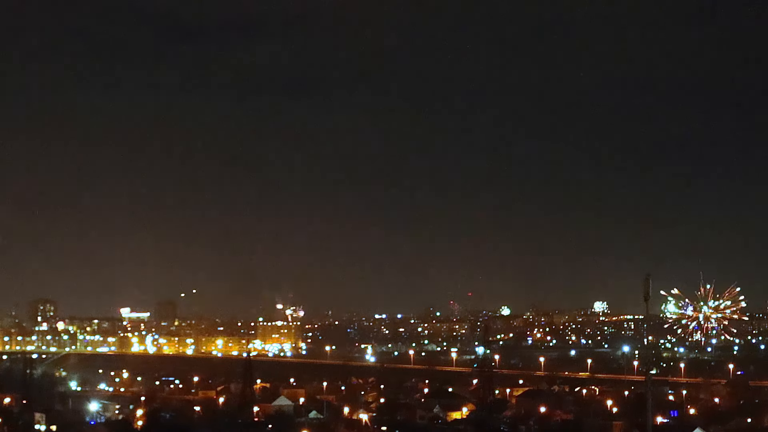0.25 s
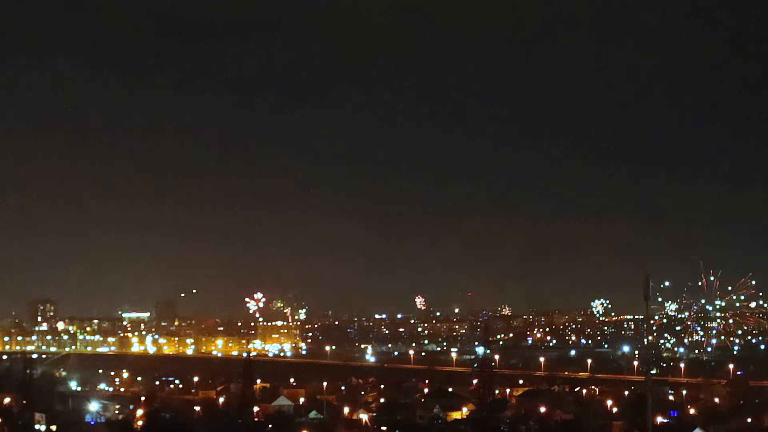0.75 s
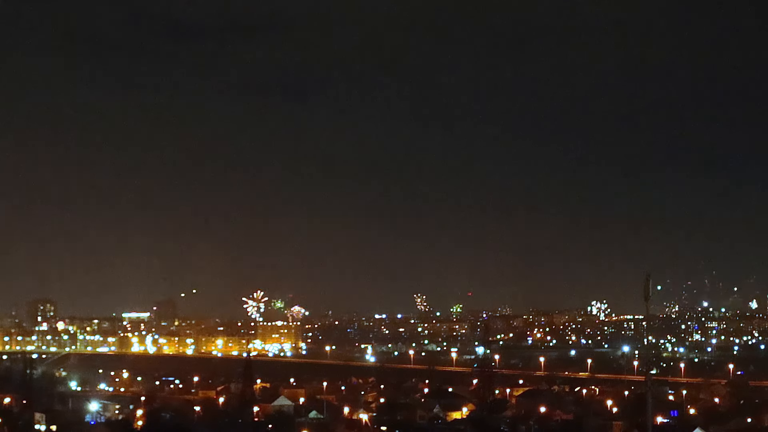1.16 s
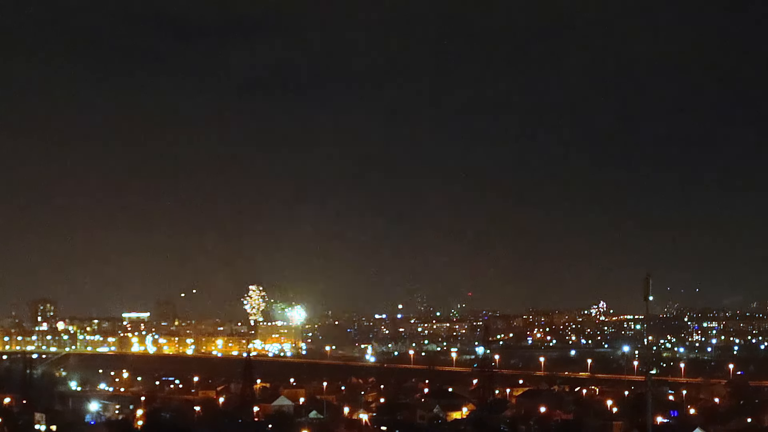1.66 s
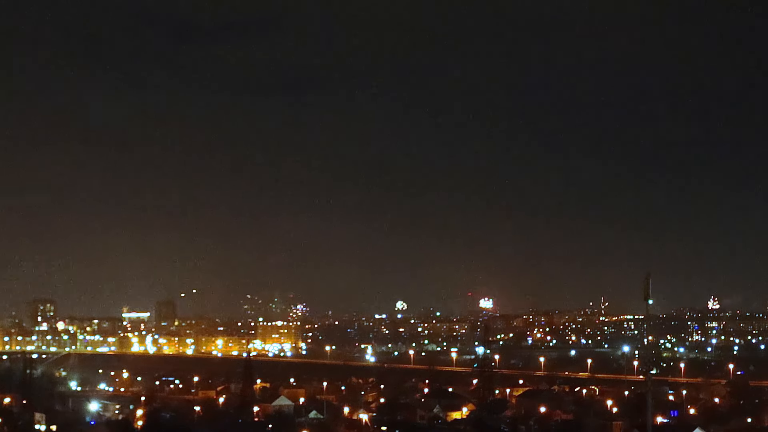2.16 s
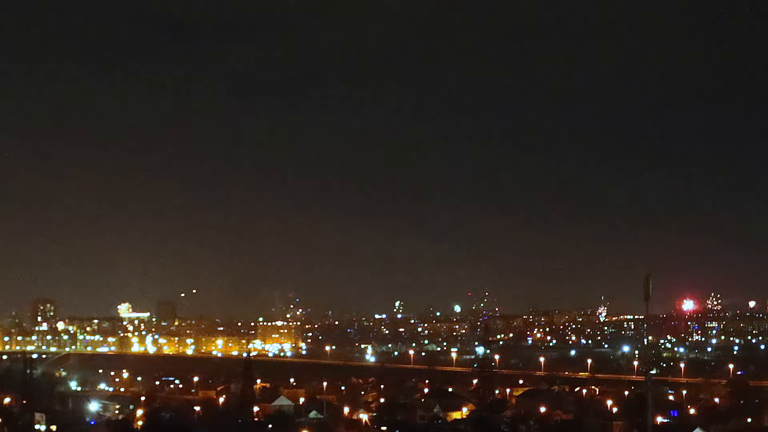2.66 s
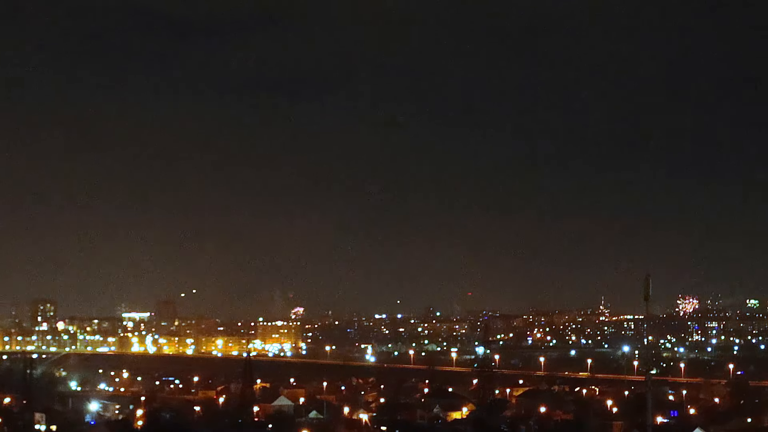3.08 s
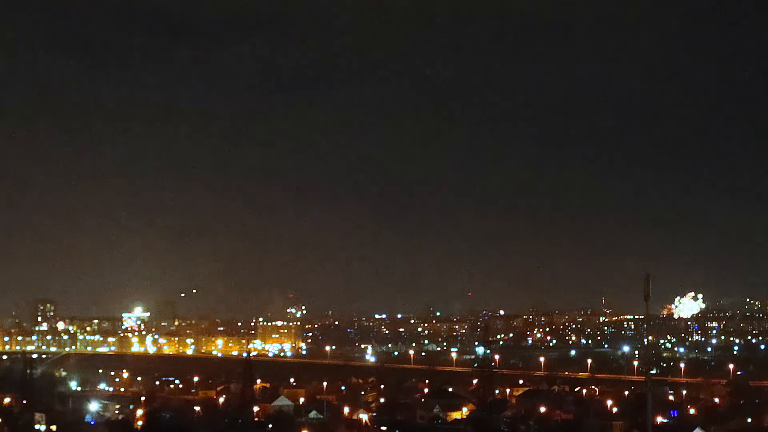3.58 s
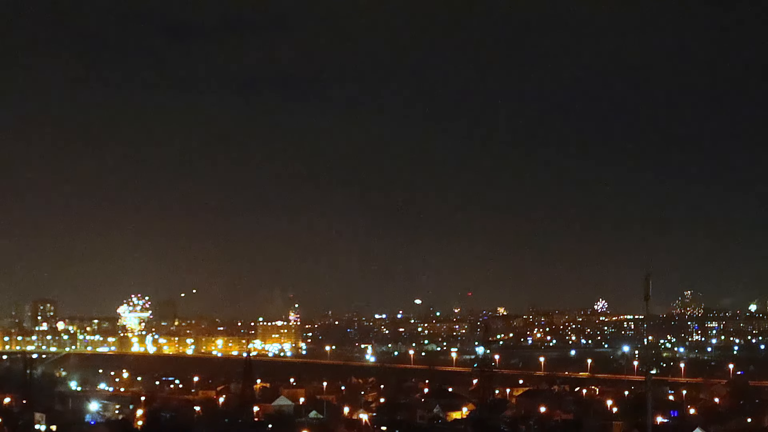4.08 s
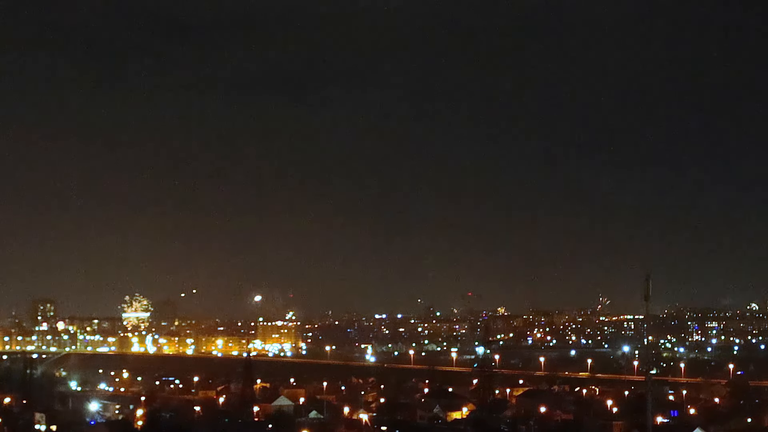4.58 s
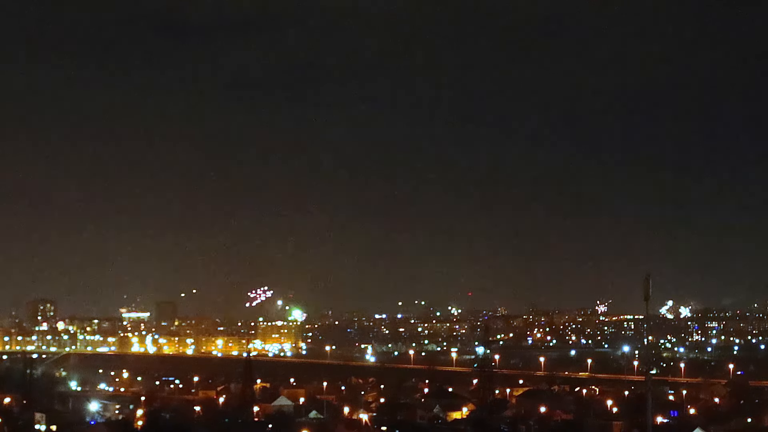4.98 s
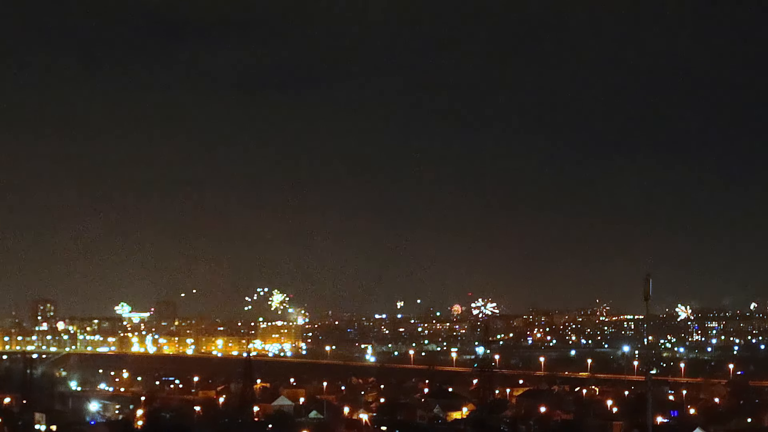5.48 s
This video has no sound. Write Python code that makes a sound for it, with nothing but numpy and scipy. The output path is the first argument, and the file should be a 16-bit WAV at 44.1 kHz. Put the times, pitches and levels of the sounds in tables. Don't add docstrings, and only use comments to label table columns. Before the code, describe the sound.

Distant fireworks over a city at night: dull overlapping thumps, short echoes and small crackles above a far rumble, with brief wind flutter at the start.

```python
import sys
import numpy as np
from scipy import signal
from scipy.fft import rfft, irfft, next_fast_len
from scipy.io import wavfile
from scipy.ndimage import uniform_filter1d

SR = 44100
rng = np.random.default_rng(int(sys.argv[2]) if len(sys.argv) > 2 else 0)


def dump(signal):
    limited = np.clip(np.atleast_2d(signal).T, -1, 1)
    pcm = np.round(limited * 32767).astype(np.int16)
    wavfile.write(sys.argv[1], SR, pcm)


def attenuation_scalar(level_db):
    decades = np.asarray(level_db, float) / 20
    return 10 ** decades


N = 252693
TIME = np.arange(N) / SR

# start in seconds, thump peak in dB, thump pitch in Hz,
# echo level in dB under the peak.
NEAR_SHELLS = [(.492, -22, 392, -10.5), (.5435, -12.5, 473, -12), (.661, -28, 271, 5.5),
               (1.568, -12.5, 343, -13), (1.628, -16, 327, -10.5), (3.094, -17.5, 526, -26),
               (3.148, -10, 254, -13), (3.547, -16.5, 240, -11), (3.837, -17.5, 241, -11),
               (4.036, -23, 254, 1), (4.7905, -11, 324, -11.5), (5.184, -13.5, 315, -11.5),
               (5.529, -14.5, 310, -11)]
# the same four columns, in seconds, dB, Hz and dB.
MIDTOWN_SHELLS = [(.25, -20.5, 533, -19), (.387, -14.5, 360, -16.5), (1.07, -20.5, 286, -6.5),
                  (1.24, -15.5, 304, -8.5), (1.327, -16, 382, -14.5), (1.492, -8, 335, -14.5),
                  (1.532, -17, 516, -8.5), (2.013, -15, 355, -11.5), (2.061, -26.5, 244, -2.5),
                  (2.201, -16, 276, -13.5), (2.779, -14, 460, -9.5), (3.284, -16, 255, -8.5),
                  (3.361, -21, 242, -3), (3.924, -14, 388, -7), (4.823, -30.5, 260, 4),
                  (4.891, -9, 322, -24), (5.098, -12, 438, -20), (5.22, -13.5, 537, -13),
                  (5.318, -20.5, 222, -6), (5.559, -15.5, 234, -13.5)]
# the same four columns, in seconds, dB, Hz and dB.
OUTSKIRTS_SHELLS = [(.701, -20, 288, -13), (.79, -24.5, 350, -4), (1.811, -28, 392, -5),
                    (2.252, -16.5, 296, -4.5), (2.515, -13.5, 310, -16.5), (2.954, -12.5, 337, -10.5),
                    (3.407, -13, 229, -15.5), (3.67, -22.5, 294, -6.5), (3.862, -15, 362, -8.5),
                    (3.977, -13.5, 387, -23.5), (4.091, -12.5, 394, -10), (4.168, -14, 416, -29),
                    (4.399, -17.5, 517, -5), (4.688, -30, 408, -5), (5.132, -12.5, 550, -15),
                    (5.721, -6.5, 530, -5)]
# shells, middle band in dB over the thump,
# echo fade by 60 dB in seconds.
DISTRICTS = [(NEAR_SHELLS, -10.5, 0.49), (MIDTOWN_SHELLS, -14.5, 0.36), (OUTSKIRTS_SHELLS, -17.5, 0.3)]
# start in seconds, thump peak in dB, pitch in Hz, number of swings,
# echo level in dB under the peak.
SALUTES = [
    (2.4858, 2, 330, 0.62, -22),
    (4.8763, -18.5, 347, 1, -9),
    (5.045, -12.5, 516, 0.59, -9.5),
]
# start in seconds, peak in dB, pitch in Hz, swings to fade, swings to rise.
STEEP_SALUTE = (4.8650, 0.1, 352, 1.7, 0.055)
# start in seconds, high band peak in dB,
# top band in dB over it, echo fade by 60 dB in seconds.
CRACKERS = [(0.115, -34, -29, 0.12), (0.218, -44.5, -32, 0.32), (0.369, -41, -24, 0.2),
            (0.544, -30, -32, 0.15), (.6629, -38.5, -29, 0.87), (0.85, -50.5, 10, 0.41),
            (1.497, -45, -10, 0.14), (1.629, -45, -16, 0.4), (1.696, -49.5, 3, 0.8),
            (1.8806, -46, -2, 0.32), (1.974, -51.5, 11, 0.42), (2.0055, -53, 6, 0.32),
            (2.061, -46.5, 8, 0.31), (2.239, -19, 2, 0.22), (2.252, -24.5, -28, 0.23), (2.27, -33, -8, 2.4),
            (2.4823, -31, -11, 0.18), (2.788, -38, -17, 0.86), (3.095, -30.5, -17, 0.16),
            (3.155, -41, -22, 0.55), (3.2929, -39.5, -18.5, 0.38), (3.687, -47.5, -13, 0.5),
            (3.855, -62.5, -14, 0.57), (4.3986, -32.5, -16, 0.28), (4.872, -29, -33, 0.25),
            (5.109, -38.5, -17, 0.91), (5.2083, -40, -4, 0.4), (5.3278, -44.5, 0, 0.92),
            (5.5343, -43, -9, 0.23), (5.5618, -38, -11, 0.29), (5.7199, -37, -2, 0.53)]
# time in seconds, level in dB, nearness in dB of extra treble per band.
FAR_RUMBLE = [(0.0, -32.5, 2), (0.17, -38.5, 5.5), (0.38, -41, 6.5), (0.67, -34.5, 5), (0.85, -38, 5),
              (1.601, -36.5, 4.5), (1.96, -38.5, 0), (2.39, -32, 1.5), (3.42, -34.5, 1.5), (3.72, -34.5, 2),
              (3.86, -39, 4), (4.02, -28, -1), (4.13, -35, 2.5), (4.47, -36.5, 3), (4.8, -37, 4),
              (5.03, -34.5, 3.5), (5.6, -33.5, -2), (5.73, -33.5, 6)]
# time in seconds, level in dB.
DEEP_SWELL = [(.2, -77), (.8, -64), (.92, -55), (1.25, -61), (1.45, -57.5), (1.6, -59), (2.0, -60.5),
              (2.28, -48.5), (3.3, -46.5), (3.5, -51), (4.05, -48.5), (4.8, -50.5), (5.2, -58.5),
              (5.55, -54.5)]
# start in seconds, peak in dB, ring in Hz,
# fade by 60 dB in seconds.
RECESS_ECHOES = [(0.36, -29, 1095, 0.31), (0.386, -27.5, 980, 0.2), (0.489, -29, 926, 0.24),
                 (0.55, -22.5, 1085, 0.087), (0.644, -32, 980, 0.3), (0.661, -20, 887, 0.23),
                 (1.077, -32.5, 1046, 0.42), (1.243, -24.5, 999, 0.22), (1.497, -34, 918, 0.2),
                 (1.576, -24, 1100, 0.13), (1.632, -27, 790, 0.18), (1.752, -31.5, 870, 0.25),
                 (2.022, -28, 1005, 0.43), (2.114, -31.5, 990, 0.23), (2.24, -22, 1134, 0.14),
                 (2.283, -30.5, 1140, 0.28), (2.44, -28, 1180, 0.14), (2.487, -19, 930, 0.12),
                 (2.583, -26.5, 1005, 0.2), (2.789, -23, 756, 0.11), (3.151, -26.5, 980, 0.15),
                 (3.178, -24, 786, 0.18), (3.293, -31, 834, 0.18), (3.374, -31.5, 800, 0.14),
                 (3.387, -23, 1013, 0.13), (3.426, -33.5, 1070, 0.2), (3.566, -31, 910, 0.19),
                 (3.596, -25, 980, 0.19), (3.679, -30, 880, 0.2), (3.839, -27.5, 880, 0.15),
                 (3.906, -25.5, 1016, 0.13), (3.943, -28, 1030, 0.55), (4.049, -21.5, 1000, 0.28),
                 (4.405, -34, 762, 0.2), (4.773, -34.5, 890, 0.15), (4.793, -18, 836, 0.25),
                 (4.864, -17.5, 970, 0.093), (5.035, -36, 740, 0.23), (5.097, -20.5, 810, 0.22),
                 (5.135, -24, 1110, 0.17), (5.173, -23.5, 980, 0.2), (5.531, -23.5, 1073, 0.37),
                 (5.563, -38.5, 1170, 0.2), (5.678, -20.5, 790, 0.17), (5.705, -21.5, 970, 0.2)]
# start in seconds, peak in dB, pitch in Hz, fade by 60 dB in seconds.
HOUSE_SLAPS = [(0.56, -21, 478, 0.087), (0.667, -29, 634, 0.052), (1.247, -24, 452, 0.096),
               (1.489, -29.5, 480, 0.1), (1.585, -20, 484, 0.045), (2.105, -20, 513, 0.08),
               (2.247, -15, 494, 0.059), (2.325, -30.5, 480, 0.08), (2.381, -32, 520, 0.08),
               (2.4925, -13, 458, 0.046), (2.612, -27, 500, 0.2), (2.783, -20.5, 495, 0.13),
               (3.033, -30.5, 490, 0.088), (3.098, -19, 530, 0.068), (3.152, -14.5, 635, 0.08),
               (3.175, -29.5, 506, 0.063), (3.205, -26, 534, 0.08), (3.282, -23, 500, 0.095),
               (3.405, -21, 515, 0.099), (3.921, -14, 452, 0.072), (3.973, -23.5, 503, 0.072),
               (4.045, -28, 519, 0.08), (4.071, -26.5, 554, 0.067), (4.401, -12, 579, 0.11),
               (4.801, -26.5, 507, 0.08), (4.825, -14.5, 619, 0.086), (4.863, -12.5, 446, 0.057),
               (5.043, -16.5, 646, 0.1), (5.101, -26.5, 485, 0.089), (5.135, -20, 480, 0.09),
               (5.187, -14, 535, 0.08), (5.22, -13, 546, 0.067), (5.299, -31, 520, 0.08),
               (5.532, -21, 534, 0.08), (5.668, -37, 543, 0.08)]
# start in seconds, peak in dB, pitch in Hz,
# fade by 60 dB in seconds.
BLOCK_ECHOES = [(0.498, -18.5, 395, 0.1), (1.283, -16.5, 327, 0.1), (1.309, -26, 296, 0.1),
                (1.603, -18.5, 320, 0.091), (2.699, -20.5, 279, 0.1), (2.729, -25.5, 245.6, 0.1),
                (2.819, -27.5, 323, 0.1), (3.189, -21, 218, 0.1), (3.677, -27, 291, 0.11),
                (3.889, -15, 343, 0.092), (3.899, -17.5, 407, 0.1), (4.139, -27.5, 360, 0.1),
                (4.169, -31, 348, 0.11), (4.909, -27.5, 425, 0.1), (4.929, -19.5, 340, 0.1),
                (4.939, -23, 350, 0.1), (5.53, -21.5, 305, 0.1), (5.579, -23, 211, 0.1),
                (5.599, -23, 198, 0.1)]
# start in seconds, peak in dB, pitch in Hz, fade by 60 dB in seconds.
ROOF_KNOCKS = [(0.372, -26.5, 647, 0.12), (0.658, -26, 622, 0.071), (1.105, -35, 780, 0.1),
               (1.295, -39, 766, 0.1), (1.636, -22, 670, 0.1), (1.813, -37, 656, 0.1),
               (2.484, -26, 657, 0.083), (2.671, -22, 659, 0.1), (2.715, -28, 700, 0.1),
               (2.783, -18.5, 725, 0.1), (3.181, -24, 770, 0.1), (3.281, -23.5, 692, 0.1),
               (3.474, -33, 622, 0.087), (4.075, -28, 640, 0.1), (4.401, -25, 650, 0.1),
               (5.123, -28, 660, 0.1), (5.171, -28, 690, 0.086), (5.379, -40, 773, 0.1),
               (5.447, -25.5, 684, 0.104), (5.489, -35, 641, 0.1), (5.521, -25, 655, 0.1),
               (5.567, -18, 663, 0.057)]
# start in seconds, peak in dB, pitch in Hz, fade by 60 dB in seconds.
BIG_BOOMS = [(1.032, -28, 182, 0.16), (1.241, -35, 183, 0.13), (1.489, -19, 163, 0.15),
             (2.014, -23, 188, 0.19), (2.2, -32, 133, 0.17), (2.231, -28, 144, 0.15),
             (2.48, -15.5, 181, 0.072), (2.777, -23, 160, 0.13), (3.144, -20, 194, 0.12),
             (3.372, -27.5, 167, 0.15), (3.512, -29, 159, 0.11), (3.556, -27, 187.4, 0.15),
             (3.67, -28.5, 185, 0.13), (3.838, -26, 146.4, 0.15), (4.04, -23.5, 145, 0.15),
             (4.095, -28, 164, 0.15), (4.783, -18, 182, 0.14), (5.215, -23.5, 185, 0.12),
             (5.559, -31, 188, 0.12)]
# start in seconds, peak in dB, centre in Hz, fade by 60 dB in seconds.
BRIGHT_CRACKS = [(.5457, -32, 1150, 0.073), (.5462, -36.5, 2000, 0.23), (.556, -45, 2300, .2),
                 (.6, -45, 2400, .1), (.665, -46, 1700, 0.18), (.7, -39, 1880, .2),
                 (.7358, -42, 1520, 0.24), (2.2377, -24.5, 2270, 0.25), (2.243, -21.5, 1370, 0.24),
                 (2.255, -28.5, 1480, 0.23), (2.2831, -39.5, 2850, 0.3), (2.32, -48, 3000, 0.56),
                 (2.3595, -42.5, 2220, 0.28), (2.4233, -40.5, 2300, 0.27), (2.487, -33, 1890, .04),
                 (4.794, -30.5, 1100, 0.089), (4.868, -31, 1500, 0.075), (4.89, -47, 2270, 0.11),
                 (5.21, -49, 3000, .06)]
# frequency in Hz, level in dB per Hz.
CITY_TONE = [(20, -48), (45, -41.5), (100, -22.5), (145, -3.5), (240, 2), (340, 4), (520, 3), (750, -8),
             (1020, -12), (1400, -19.5), (2000, -26), (3200, -51.5), (5000, -78.5), (9000, -99)]
# frequency in Hz, level in dB per Hz.
SNAP_TONE = [(1500, -20), (2200, -2), (2900, 0), (3700, -7), (4700, -21), (6000, -38), (8000, -60)]
# frequency in Hz, width in Hz, added ring in dB.
STANDING_WAVES = [(89, 7.4, -7), (195.5, 4.7, -2.5), (254, 16, -4), (337.2, 37, -9), (2066, 17, -3.5),
                  (2300, 11, -8.5), (2550, 17, -7.5), (2820, 8.3, -0.5), (3130, 25, -1.5), (3350, 35, -3)]
# start in seconds, length in seconds, peak in dB, flutter in Hz.
GUSTS = [
    (.002, 0.027, -35.5, 100),
    (.0372, 0.0052, -11, 211),
    (.0515, 0.019, -11.5, 235),
    (.0735, .0055, -12, 400),
    (.088, 0.0055, -20.5, 161),
    (.0996, 0.01, -8, 192),
    (.111, .014, -15.5, 190),
    (.1255, 0.0085, -15, 150.5),
    (.136, 0.021, -40.5, 118.6),
]
# start in seconds, level in dB, centre in Hz, width in Hz, fade by 60 dB in seconds.
RUSTLES = [(2.238, -66.5, 5200, 2220, 0.24), (2.4872, -62, 5030, 3030, .02),
           (2.9, -61.5, 5170, 3180, 0.018), (4.8645, -50, 4980, 4500, 0.025), (3.86, -75, 6060, 1740, 0.94),
           (4.25, -70, 5760, 1730, 0.5), (4.357, -44, 3460, 1019, 0.07), (4.372, -44, 3360, 400, 0.046),
           (4.365, -43.5, 2770, 1790, 0.23), (4.356, -59, 5630, 4770, 0.25), (5.1, -56, 2000, 1300, 0.14),
           (4.67, -76, 5290, 604, 0.89), (5.131, -58, 10000, 9700, .2), (5.182, -67, 9800, 8720, 0.4),
           (5.302, -59, 4800, 3930, 0.26), (5.31, -68, 9500, 8520, 0.42)]
# frequency in Hz, level in dB per Hz.
HISS_TONE = [(1500, -7.5), (3000, 3), (4500, -4), (6500, -6.5), (9000, -11), (12000, -11), (12700, -15),
             (13400, -42)]
# band bottom in Hz, band top in Hz,
# sound level in dB from which the band starts to empty.
HISS_DROPOUT = [(4500, 6500, -22.5), (6500, 9000, -26), (9000, 15000, -26.5)]

BODY_HZ, MIDDLE_HZ, HIGH_HZ = 100, 750, 1850
PORT_LEAD, PORT_SPREAD = 3.2, 10.3


def fireworks():
    power, body_db = far_rumble()
    direct = shells(power)
    crack_power, top_power = crackers(power[3])
    power[0] *= (power[1] / attenuation_scalar(2 * body_db)) ** 0.89
    spikes = arrivals(3.51)

    edges_hz = (0, BODY_HZ, MIDDLE_HZ, HIGH_HZ, SR)
    sky = echoes(spikes)
    for k in range(4):
        sky = sky + colour(spikes * np.sqrt(power[k]), CITY_TONE, edges_hz[k], edges_hz[k + 1])
    sky = sky + colour(spikes * np.sqrt(crack_power), CITY_TONE, 1225.0, HIGH_HZ)
    sky = sky + colour(spikes * np.sqrt(top_power), SNAP_TONE)
    sky = balcony_ring(sky)
    wind_filter = signal.butter(2, 130, "high", fs=SR, output="sos")
    sky = bass_guard(sky + signal.sosfiltfilt(wind_filter, direct))

    bounce_s, bounce_db = 0.00077, -15
    bounce = np.array([np.interp(TIME - bounce_s, TIME, port) for port in sky])
    return sky + attenuation_scalar(bounce_db) * bounce


def shells(power):
    direct = np.zeros((2, N))
    bursts = []
    for rows, middle_db, t60 in DISTRICTS:
        for start, db, hz, echo_db in rows:
            bursts.append((start + 0.0017, db, hz, 0.8, middle_db, echo_db, t60))
    for start, db, hz, swings, echo_db in SALUTES:
        bursts.append((start, db, hz, swings, -12.5, echo_db, 0.3))

    for start, db, hz, swings, middle_db, echo_db, t60 in bursts:
        lead = PORT_LEAD + 9.0 * rng.standard_normal()
        add(direct, *thump(start, db - 3.6, hz, swings, lead))
        add(direct, *thump(start, db + middle_db - 5.5, 1080, 1.4, lead))
        at, roll = fade(start + 0.0019, t60, 0.0034)
        band_db = np.array([[-34.0], [-2.5], [middle_db + 4.0]])
        add(power[:3], at, roll * attenuation_scalar(2 * (db + echo_db + band_db)))
    add(direct, *shock(*STEEP_SALUTE))
    return direct


def thump(start, db, hz, swings, lead):
    delay = np.maximum([[-lead], [lead]], 0) / SR
    age = np.clip(np.arange(1400) / SR - delay, 0, None) * hz
    swell = (age / swings * np.exp(1 - age / swings)) ** 1.5
    return int(start * SR), -attenuation_scalar(db) * swell * np.sin(2 * np.pi * age)


def shock(start, db, hz, fade_swings, rise_swings):
    delay = np.array([[0], [3.5 / SR]])
    age = np.clip(np.arange(1400) / SR - delay, 0, None) * hz
    swell = (1 - np.exp(-age / rise_swings)) ** 2 * np.exp(-age / fade_swings)
    return int(start * SR), -attenuation_scalar(db + 3.0) * swell * np.sin(2 * np.pi * (age + 0.069))


def crackers(high_power):
    crack, top = np.zeros((2, N))
    for start, db, top_db, t60 in CRACKERS:
        at, roll = fade(start, t60, 0.00038)
        add(high_power, at, roll * attenuation_scalar(2 * (db - 9.0)))
        add(crack, at, roll * attenuation_scalar(2 * (db - 10.5 + 8)))
        add(top, at, roll ** 3.7 * attenuation_scalar(2 * (db - 17.5 + top_db)))
    return crack, top


def echoes(spikes):
    later = spikes[:, ::-1]
    cracks = rings(BRIGHT_CRACKS, spikes, swings=1.6, knock_db=-1.0, tail_db=-10.0, width=0.19)
    air = signal.butter(4, 3400, fs=SR, output="sos")
    return (rings(RECESS_ECHOES, later, swings=1.8, knock_db=-3.5, tail_db=-8.0, width=0.063)
            + rings(HOUSE_SLAPS, later, swings=1.4, knock_db=-5.0, tail_db=-9.5, width=0.11)
            + rings(BLOCK_ECHOES, later, swings=1.3, knock_db=-5.0, tail_db=-13.0, width=0.34)
            + rings(ROOF_KNOCKS, later, swings=3.1, knock_db=-4.5, tail_db=-7.0, width=0.16)
            + rings(BIG_BOOMS, spikes, swings=1.0, knock_db=-5.5, tail_db=-17.0, width=0.099)
            + signal.sosfilt(air, cracks))


def rings(table, spikes, swings, knock_db, tail_db, width):
    out = np.zeros((2, N))
    for start, db, hz, t60 in table:
        add(out, *thump(start + 0.00054, db + knock_db, hz, swings, PORT_LEAD))
        at, power = fade(start, min(t60, 0.6), 0.004)
        band = signal.butter(1, (hz * (1 - width), hz * (1 + width)), "band", fs=SR, output="sos")
        puff = spikes[:, at:at + len(power)] * np.sqrt(power[:N - at] * SR / 4 / width / hz)
        add(out, at, attenuation_scalar(db + tail_db) * signal.sosfilt(np.vstack([band, band]), puff))
    return out


def far_rumble():
    seconds, far_db, near_db = np.transpose(FAR_RUMBLE)
    body_db = np.interp(TIME, seconds, far_db)
    near_db = np.interp(TIME, seconds, near_db)
    bass_db = np.interp(TIME, *np.transpose(DEEP_SWELL))
    middle_db = body_db - 8 + near_db
    high_db = body_db - 33 + 2 * near_db
    return attenuation_scalar(2 * np.array([bass_db, body_db, middle_db, high_db])), body_db


def arrivals(scatter_db, count=7):
    out, size = np.zeros((2, N)), next_fast_len(N)
    for side in np.linspace(-1.5, 1.5, count):
        unevenness = np.minimum(rng.exponential(size=N), 7)
        spikes = rng.standard_normal(N) * attenuation_scalar(min(scatter_db, 4.5) * unevenness)
        lag = PORT_LEAD + PORT_SPREAD * side
        turn = np.exp(-2j * np.pi * np.fft.rfftfreq(size) * lag)
        delayed = irfft(rfft(spikes, size) * turn, size)[:N]
        out += np.exp(-side ** 2 / 4) * np.array([spikes, delayed])
    return unit(out)


def balcony_ring(sky):
    ring = np.zeros((2, N))
    for hz, width_hz, db in STANDING_WAVES:
        ring += attenuation_scalar(db) * signal.lfilter(*signal.iirpeak(hz, hz / width_hz, fs=SR), sky)
    return sky + ring


def bass_guard(sky):
    share, ends_s, release_s = 0.66, 1, 0.098
    bass = signal.sosfiltfilt(signal.butter(2, 172, fs=SR, output="sos"), sky)
    return sky - share * np.clip((ends_s - TIME) / release_s, 0, 1) * bass


def wind():
    buffet_s, buffet_db = 0.175, -25
    tone = [(15, -43.0), (60, -2), (150, -8.5), (400, -16.5), (1000, -28.5), (2500, -78.0)]  # Hz, dB per Hz
    low = colour(rng.standard_normal((1, N)), tone)[0]
    out = attenuation_scalar(buffet_db) * low * np.clip((buffet_s - TIME) / 0.004, 0, 1)
    waver = unit(uniform_filter1d(rng.standard_normal(N), size=120))
    for start, length, db, hz in GUSTS:
        gate = np.clip(np.minimum(TIME - start, start + length - TIME) / 0.002, 0, 1)
        swing = np.sin(2 * np.pi * hz * (TIME - start) + 0.2 * waver)
        out = out + attenuation_scalar(db) * gate * np.tanh(1.7 * swing) * attenuation_scalar(2.4 * waver)
    port_filter = signal.butter(2, (55, 1300), "band", fs=SR, output="sos")
    return signal.sosfiltfilt(port_filter, out) * attenuation_scalar(np.array([[-18.0], [0]]))


def rustles():
    out = np.zeros((2, N))
    fibres = rng.standard_normal((3, N)) * attenuation_scalar(2.0 * rng.exponential(size=N))
    fibres = unit(fibres[:2] + fibres[2])
    fibres = fibres * attenuation_scalar(np.array([[-0.8], [0.8]]))
    for start, db, hz, width_hz, t60 in RUSTLES:
        at, power = fade(start, t60, 0.0016)
        band = signal.butter(4, (hz - width_hz / 2, hz + width_hz / 2), "band", fs=SR, output="sos")
        puff = fibres[:, at:at + len(power)] * np.sqrt(power[:N - at] * SR / 2 / width_hz)
        add(out, at, attenuation_scalar(db) * signal.sosfilt(band, puff))
    return out


def input_hiss(dry):
    hiss = attenuation_scalar(-70.5) * colour(rng.standard_normal((2, N)), HISS_TONE)
    loud_db = 10 * np.log10(uniform_filter1d(np.mean(dry ** 2, axis=0), size=1500) + 1e-12)
    for lo_hz, hi_hz, empty_db in HISS_DROPOUT:
        whim_db = 2.5 * np.repeat(rng.standard_normal(N // 1024 + 1), 1024)[:N]
        lost = np.clip((loud_db + whim_db - empty_db) / 1.6, 0, 1)
        lost = uniform_filter1d(lost, size=400)
        band = signal.butter(4, (lo_hz, hi_hz), "band", fs=SR, output="sos")
        hiss = hiss - lost * signal.sosfiltfilt(band, hiss)
    return hiss


def unit(x):
    return x / np.sqrt(np.mean(x ** 2))


def colour(x, points, lo_hz=0, hi_hz=SR):
    hz = np.fft.rfftfreq(8192, 1 / SR) + 1
    point_hz, db = np.transpose(points)
    gain = attenuation_scalar(np.interp(np.log(hz), np.log(point_hz), db))
    gain = gain / np.sqrt((1 + (lo_hz / hz) ** 8) * (1 + (hz / hi_hz) ** 8))
    cepstrum = irfft(np.log(gain + 1e-9))
    cepstrum[1:4096] *= 2
    cepstrum[4097:] = 0
    response = irfft(np.exp(rfft(cepstrum)))[:4096]
    response = response / np.sqrt(np.sum(response ** 2))
    x = np.pad(x, ((0, 0), (4096, 0)), "reflect")
    return signal.fftconvolve(x, response[None], axes=1)[:, 4096:4096 + N]


def fade(start, t60, rise_s):
    t60 = max(t60, 0.02)
    age = np.arange(int(t60 * SR)) / SR
    return int(start * SR), (1 - np.exp(-age / rise_s)) * np.exp(-2 * np.log(1000) * age / t60)


def add(out, at, wave):
    out[..., at:at + wave.shape[-1]] += wave[..., :N - at]


def scene():
    return fireworks() + wind() + rustles()


def band_limit(x):
    return signal.sosfilt(signal.butter(12, 14300, fs=SR, output="sos"), x)


def record(dry):
    clip_db, right_db, right_treble_db, stop_s = -1.3, 2.3, -11, 0.0005
    heard = dry + input_hiss(dry)
    treble = signal.sosfiltfilt(signal.butter(1, 1200, "high", fs=SR, output="sos"), heard)
    heard = heard + attenuation_scalar(right_treble_db) * treble * np.array([[-0.5], [0.5]])
    heard = heard * np.clip((N / SR - TIME) / stop_s, 0, 1)
    held = np.clip(heard, -attenuation_scalar(clip_db), attenuation_scalar(clip_db))
    mix = held * attenuation_scalar(np.array([[-right_db / 2], [right_db / 2]]))
    return band_limit(mix)


dry = scene()
out = record(dry)
dump(out)
```